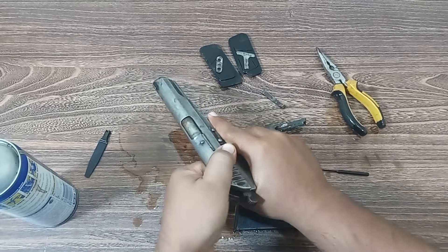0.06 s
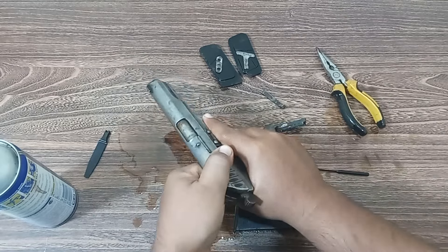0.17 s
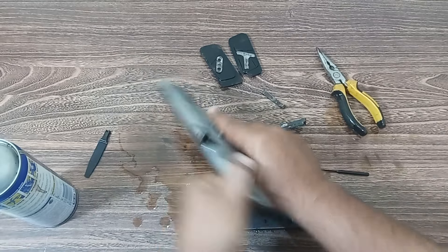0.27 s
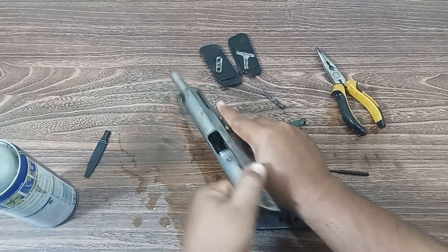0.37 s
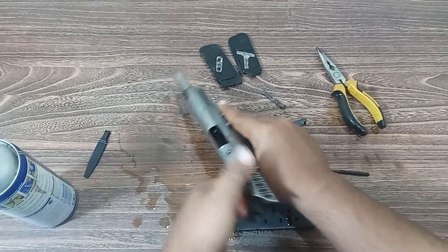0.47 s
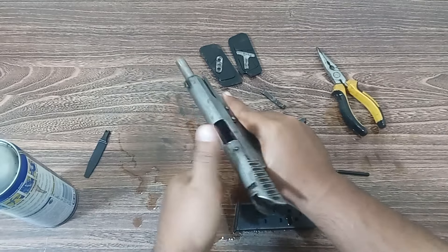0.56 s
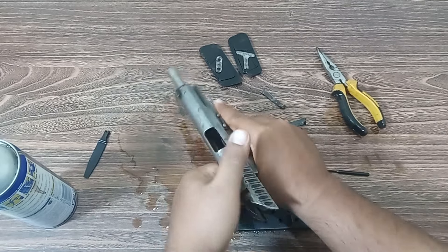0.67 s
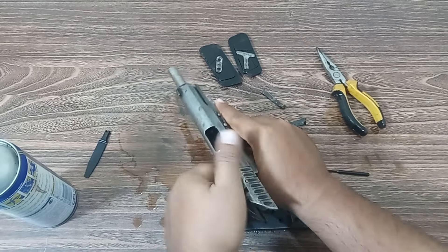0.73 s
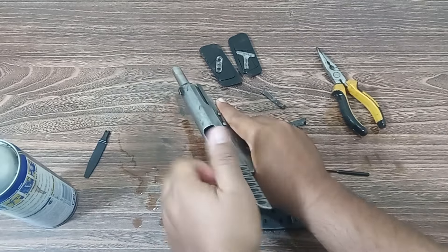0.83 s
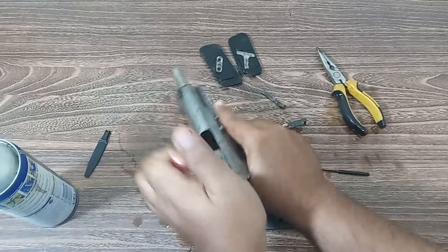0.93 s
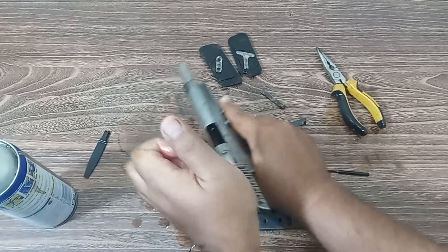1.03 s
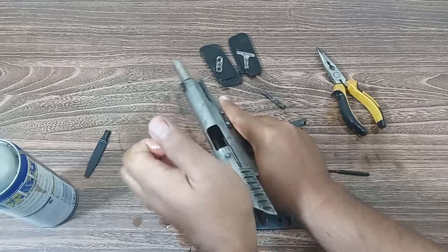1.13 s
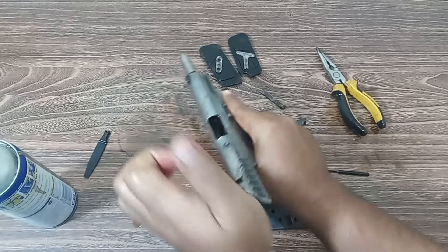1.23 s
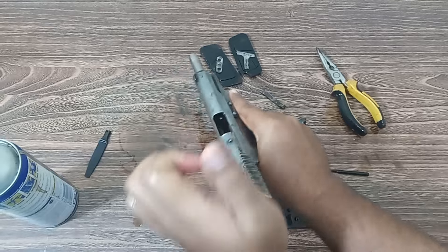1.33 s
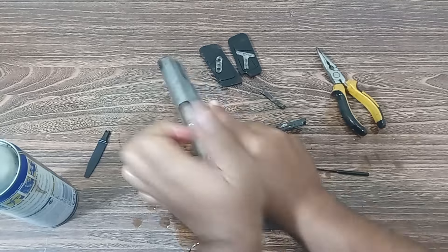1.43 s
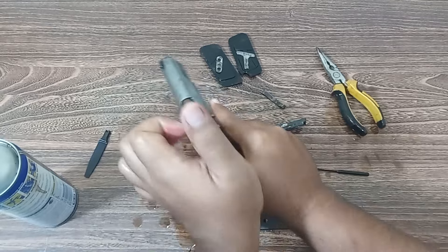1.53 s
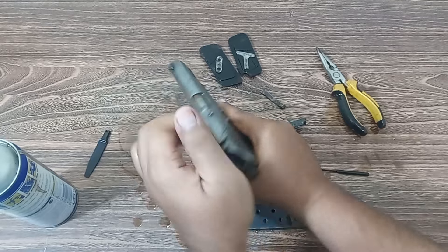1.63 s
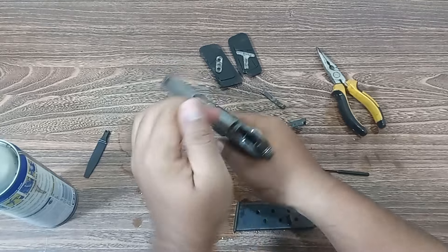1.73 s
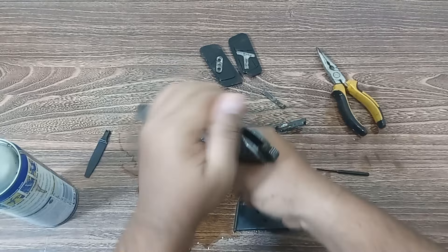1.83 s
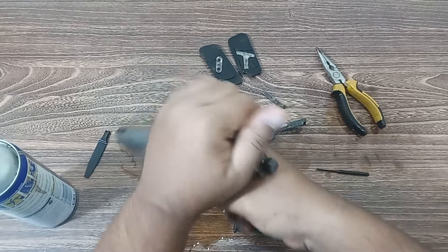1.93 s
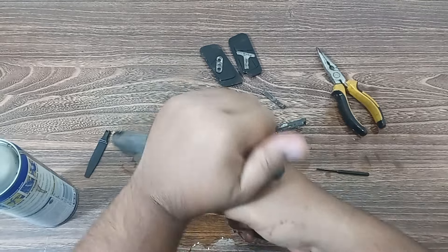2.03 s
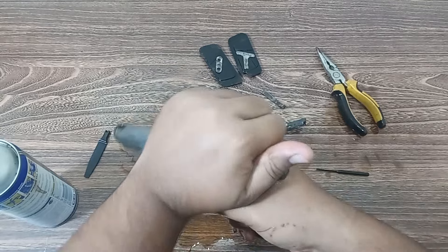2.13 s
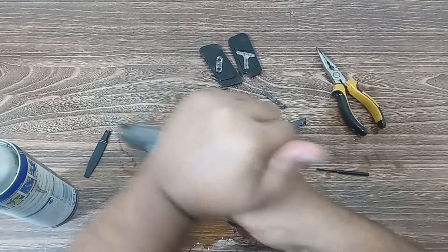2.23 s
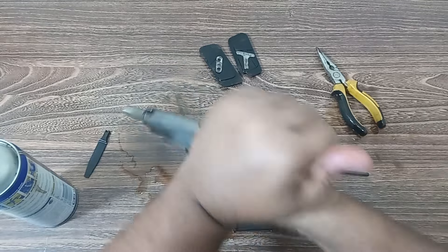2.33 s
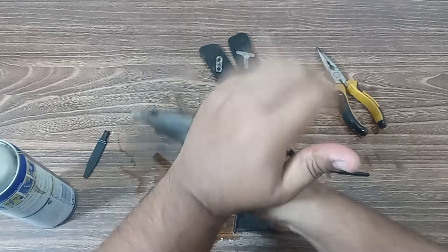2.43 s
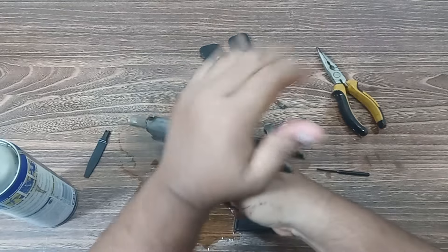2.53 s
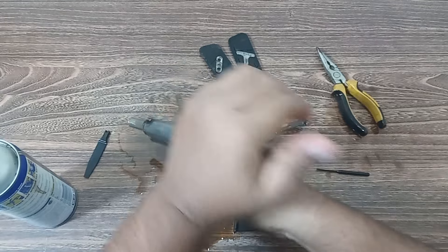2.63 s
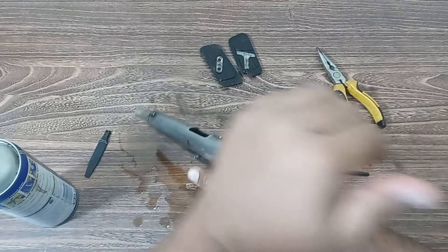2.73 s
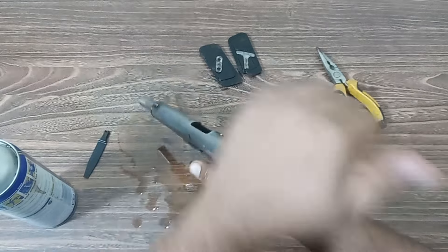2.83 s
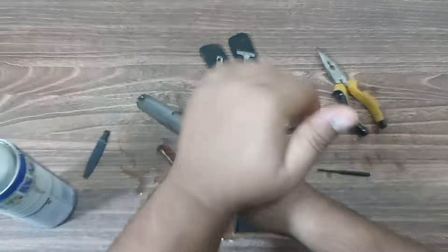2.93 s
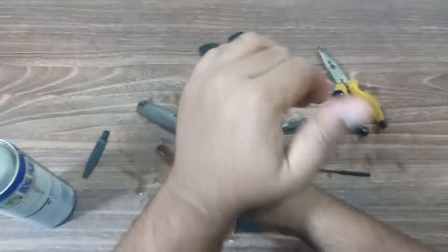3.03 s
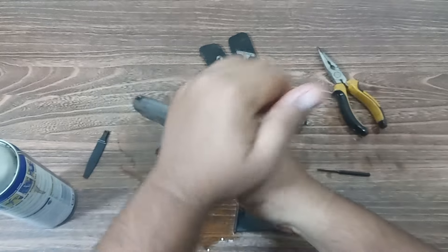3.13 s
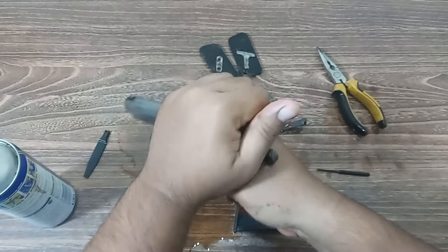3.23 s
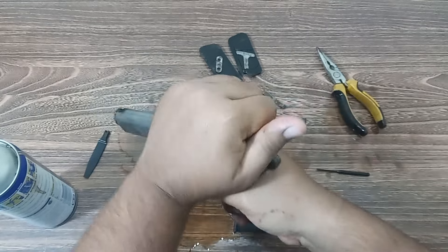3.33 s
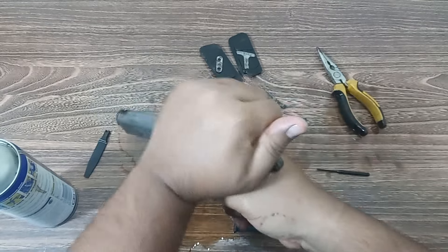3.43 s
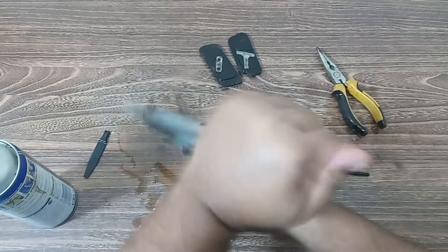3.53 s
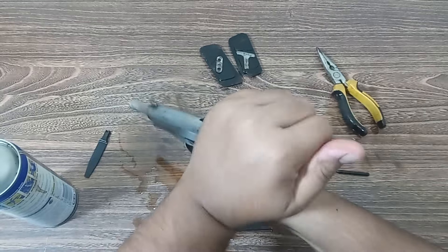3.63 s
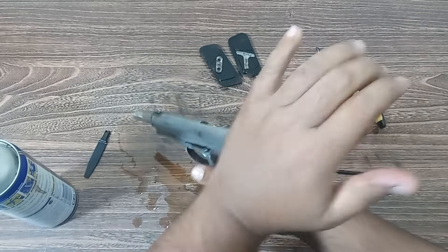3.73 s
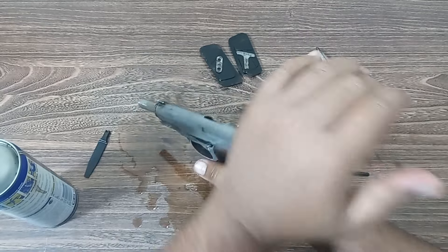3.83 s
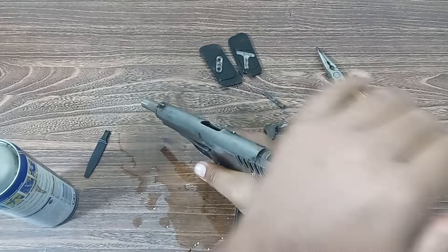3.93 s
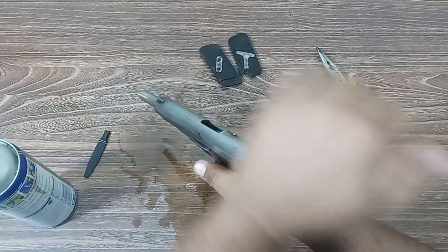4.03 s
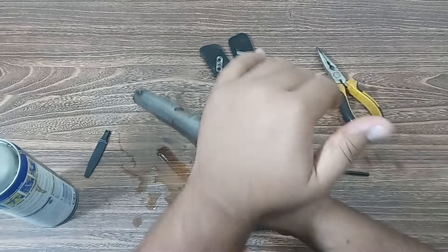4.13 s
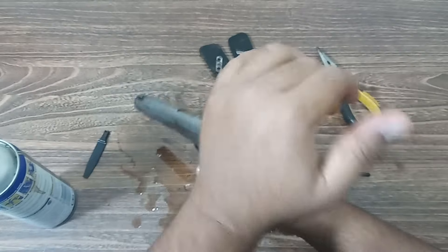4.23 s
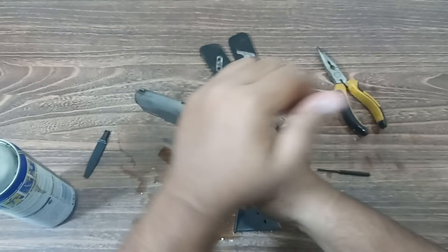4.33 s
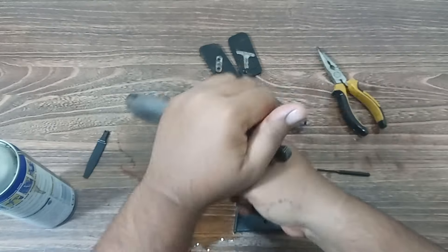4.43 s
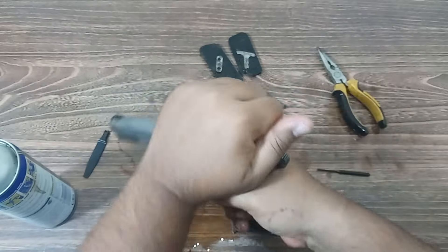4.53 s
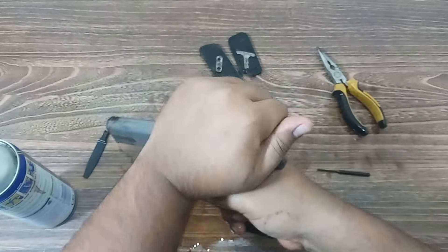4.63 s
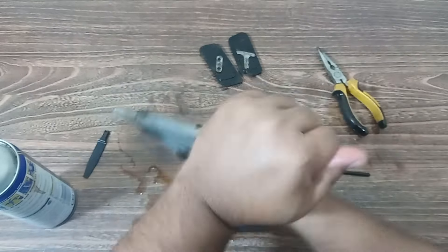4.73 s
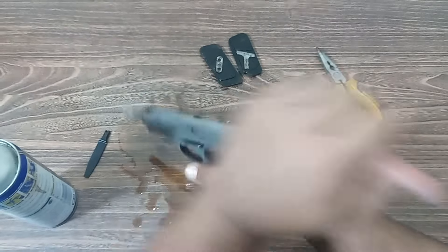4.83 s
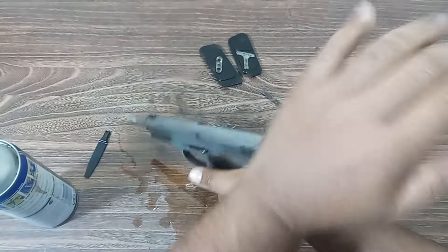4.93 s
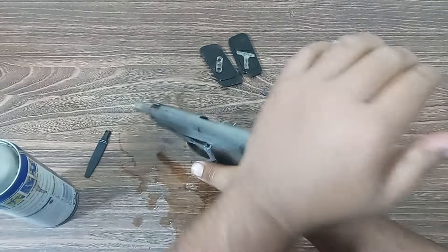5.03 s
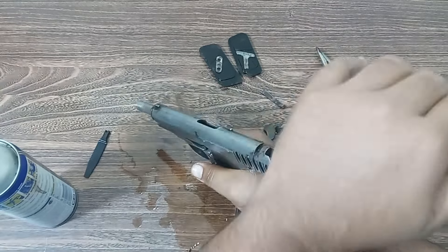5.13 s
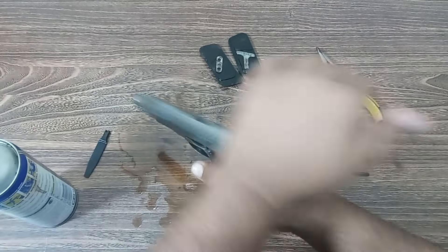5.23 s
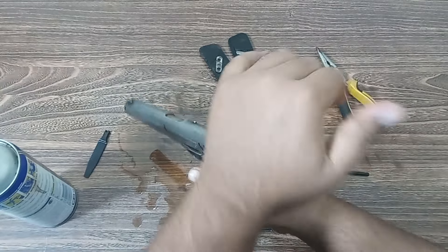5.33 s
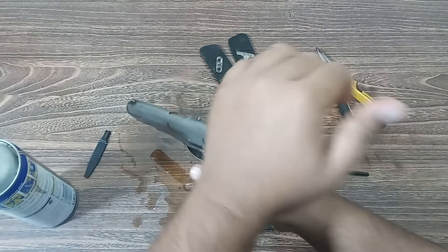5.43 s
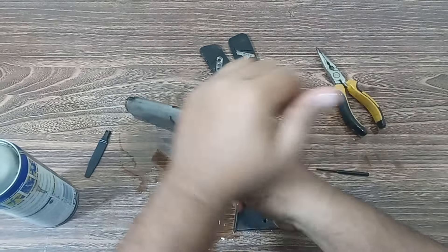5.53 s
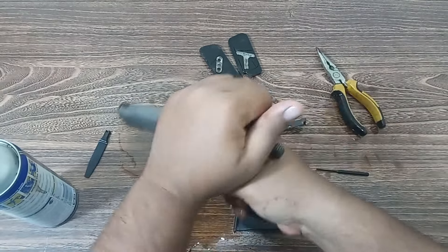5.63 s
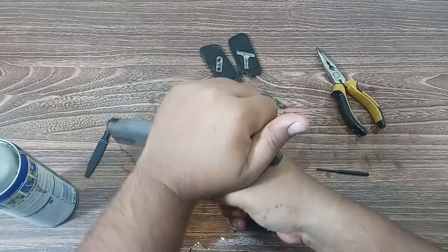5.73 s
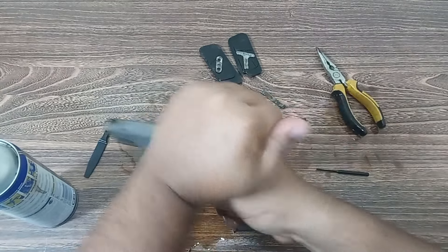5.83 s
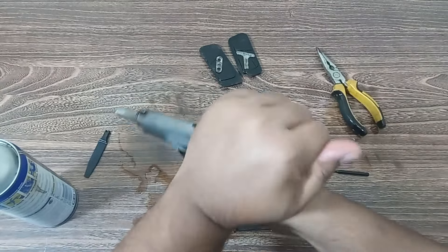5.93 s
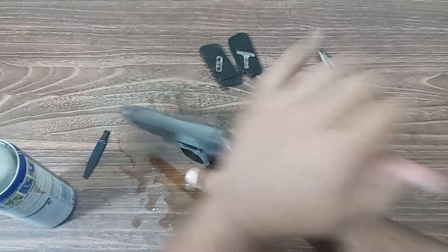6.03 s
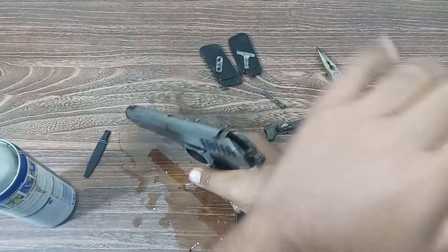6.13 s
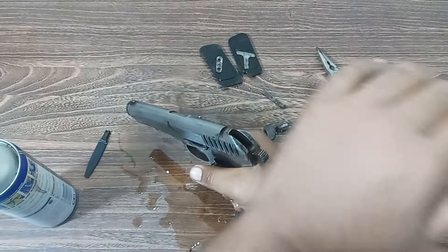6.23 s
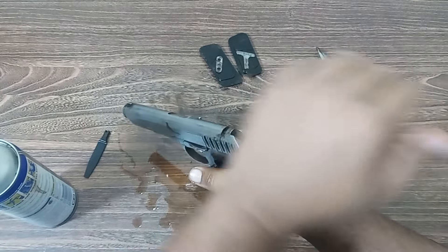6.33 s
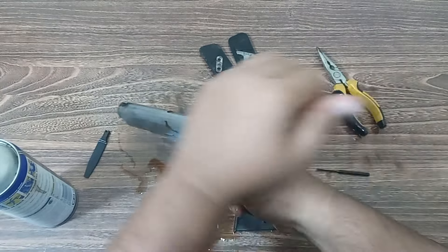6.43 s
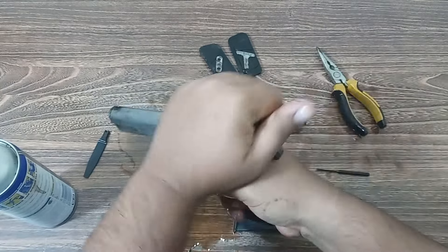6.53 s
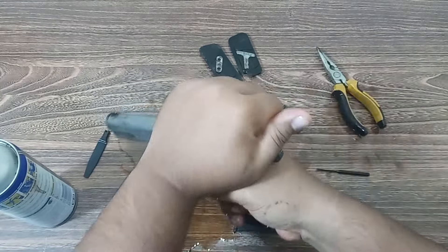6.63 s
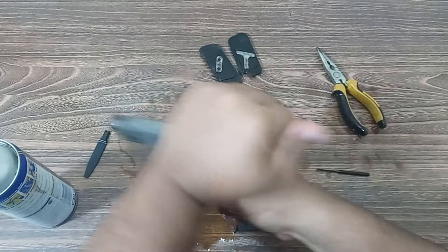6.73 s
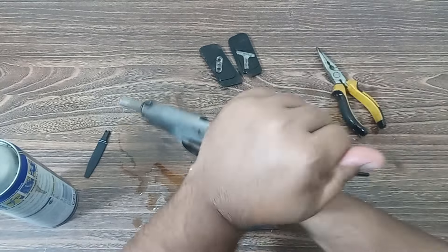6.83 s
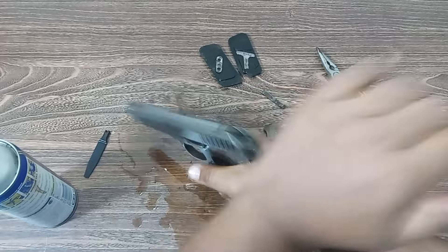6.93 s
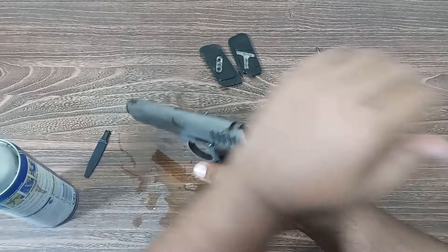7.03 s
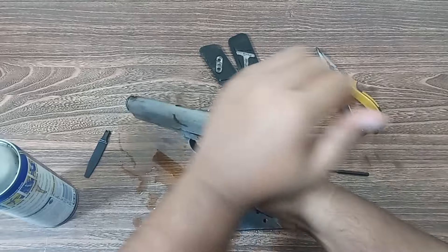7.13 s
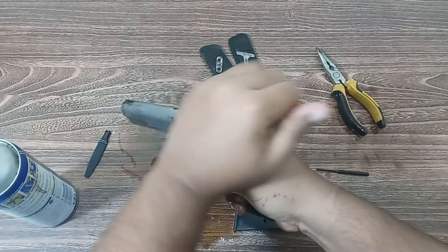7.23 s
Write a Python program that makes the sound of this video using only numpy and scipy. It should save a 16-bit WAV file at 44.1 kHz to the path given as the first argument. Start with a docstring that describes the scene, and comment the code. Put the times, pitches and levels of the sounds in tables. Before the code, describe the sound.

A steel pistol is racked over a table in a bare, reverberant room, close to a mono microphone. A metallic clack sounds right at the start. Around 0.3 seconds the slide is drawn back with a short scrape and a rapid run of four clacks, fairly dry, then waits; at 1.5 it slams home with a loud bright crack, a dull thump and faint high steel ringing. Pulls follow at about 2.3, 3.6, 4.75, 5.9 and 6.8 seconds, each a tight clicking clatter, answered by slams at 2.9, 4.1, 5.3, 6.1 and 7.0. The last two pairs are quickest, with barely 0.2 seconds between pull and slam. Compression ducks each blow and lets the room echo swell behind it before dying away. Tiny finger ticks and loose-part rubs appear between actions over quiet hiss.

```python
"""A steel pistol is racked again and again over a table in a bare, echoing room.
Each pull scrapes along the rails and clacks four times until the slide locks open; released, it slams home.
Blows and scrapes are bursts of uneven noise, shaped to sound like steel; ringing parts are fading sines.
Fingers and loose parts tick softly, over a quiet background hiss.
A close mono microphone with a look-ahead compressor ducks every blow and lets the room swell up behind it."""
import sys
import numpy as np
from scipy import signal
from scipy.fft import rfft, irfft
from scipy.io import wavfile
from scipy.ndimage import uniform_filter1d, minimum_filter1d

SR = 44100
rng = np.random.default_rng(int(sys.argv[2]) if len(sys.argv) > 2 else 0)


def dump(signal):
    """Clip the signal to [-1, 1] and save it as 16-bit WAV at the path in sys.argv[1]."""
    limited = np.clip(np.atleast_2d(signal).T, -1, 1)
    pcm = np.round(limited * 32767).astype(np.int16)
    wavfile.write(sys.argv[1], SR, pcm)


N = 321048

# The slide slams shut: t/s, strength/dB, length/s, ring/dB and knock/dB (both relative to the strength),
# thump/dB, starting pitch of the thump f/Hz, bounce/dB, scrape on the way/dB
SLIDE_SLAMS = [(0.009, -5, 0.005, -7, -25, -34, 250, -36.5, -32),
               (1.459, 7, 0.0053, -5.5, -12, -2.5, 270, -22, -18),
               (2.916, 8.5, 0.0022, -4.5, -11.5, -2, 263, -22, -25.5),
               (4.1088, 5.5, 0.0057, -3, -14, -10, 810, -14, -16.5),
               (5.286, 6, 0.0046, -7, -9.5, -11, 386, -19.5, -30),
               (6.078, 1, 0.0091, -2.5, -9.5, -5.5, 228, -25, -33),
               (6.9754, 4, 0.0053, -6, -10.5, -14, 473, -10, -25.5)]
# The slide is drawn back: t/s at the rear stop, travel time/s, first scrape/dB,
# then the force of the contacts: at the unlocking/dB, in mid travel/dB, at the stop/dB
SLIDE_PULLS = [(0.3385, 0.084, -46, -6, -2, -8), (2.3122, 0.0477, -38, 2, -0.5, 0),
               (3.5646, 0.0524, -43, 2, 0, 0), (4.752, 0.0528, -31, 0, 1, -1.5),
               (5.922, 0.0585, -32, -8, 1, -1), (6.8085, 0.0535, -39, -14, 0, -2)]
# Colour of steel striking steel, only its shape counts: f/Hz, level per Hz/dB
STEEL_COLOUR = [(150, -37.5), (350, -29.5), (800, -24.5), (1500, -14.5), (2050, -6), (3000, -7),
                (3900, -0.5), (5200, -0.5), (6800, 5.5), (7400, -5), (8100, -13), (10500, -13.5),
                (13200, -22.5), (15300, -8.5)]


def from_db(db):
    """Decibels to gain."""
    return 10 ** (np.asarray(db) / 20)


def at_hz(points, hz):
    """Read a table between its points, along a logarithmic frequency axis."""
    known_hz, values = np.transpose(points)
    return np.interp(np.log(np.maximum(hz, 1)), np.log(known_hz), values)


def coloured(x, spectrum):
    """Give a sound a colour without sounding early (minimum phase); white noise keeps its power."""
    size = 8192
    gain = from_db(at_hz(spectrum, np.fft.rfftfreq(size, 1 / SR)))
    gain /= np.sqrt(np.mean(gain ** 2))
    # folding the cepstrum moves the filter's energy to its start
    cepstrum = irfft(np.log(gain))
    cepstrum[1:size // 2] *= 2
    cepstrum[size // 2 + 1:] = 0
    response = irfft(np.exp(rfft(cepstrum)))
    return signal.oaconvolve(x, response)[:N]


def ring(force, hz, t60):
    """A resonance: a unit click starts a sine of height 1 that fades by 60 dB in t60 seconds."""
    decay = from_db(-60 / (t60 * SR))
    step = 2 * np.pi * hz / SR
    feedback = [1, -2 * decay * np.cos(step), decay * decay]
    return signal.lfilter([0, np.sin(step)], feedback, force + 1e-18)


def clicks(times, levels_db):
    """One single impulse for each blow."""
    out = np.zeros(N)
    places = np.clip(np.round(np.asarray(times) * SR).astype(int), 0, N - 1)
    np.add.at(out, places, from_db(levels_db))
    return out


def contacts(rows, rise_s, fade_s, grain_db):
    """Each (t/s, level/dB, length/s) is a chatter of uneven impacts that builds, holds, then dies away."""
    out = np.zeros(N + SR)
    t = np.arange(SR // 4) / SR
    for s, db, length in rows:
        # every 16 samples the impacts change size
        grain = from_db(grain_db * rng.standard_normal(len(t) // 16 + 1))
        sizes = grain[np.arange(len(t)) // 16]
        envelope = (1 - np.exp(-t / rise_s)) * np.exp(-np.maximum(t - length, 0) / fade_s)
        burst = rng.standard_normal(len(t)) * sizes * envelope
        burst *= np.linalg.norm(envelope) / np.linalg.norm(burst)   # same energy in every draw
        start = max(round(s * SR), 0)
        out[start:start + len(t)] += from_db(db) * burst
    return out[:N]


def background():
    """A quiet, steady noise with its own colour."""
    # Colour of the background, only its shape counts: f/Hz, level per Hz/dB
    background_colour = [(25, -19.5), (70, 1.5), (250, 1.5), (600, -7.5), (1400, -10.5), (2000, -8.5),
                         (3000, -11), (6800, 3), (8000, -18), (15000, -31)]
    return from_db(-69) * coloured(rng.standard_normal(N), background_colour)


def scrapes():
    """The slide runs along its rails before each slam and at the start of each pull: t/s, level/dB, length/s."""
    run_up_s, run_up_scrape_s = 0.0225, 0.024   # the freed slide sets off this long before it slams
    lead_s, lead_scrape_s = 0.012, 0.025   # the scrape starts this long before the barrel unlocks
    forward = [(s - run_up_s, scrape_db, run_up_scrape_s) for s, *_, scrape_db in SLIDE_SLAMS]
    backward = [(s - travel_s - lead_s, scrape_db, lead_scrape_s)
                for s, travel_s, scrape_db, *_ in SLIDE_PULLS]
    return forward + backward


def rails():
    """Gritty sliding friction, with two hollow notes from the open frame."""
    friction = contacts(scrapes(), rise_s=0.003, fade_s=0.002, grain_db=3.0)
    soften = signal.butter(1, 7000, fs=SR, output="sos")
    softened = signal.sosfilt(soften, coloured(friction, STEEL_COLOUR))
    high_note = from_db(-36.5) * ring(friction, hz=1400, t60=0.051)
    low_note = from_db(-48.0) * ring(friction, hz=695, t60=0.0028)
    return softened + high_note + low_note


def slams():
    """The spring drives the slide home: a bright crack, and the barrel rings on faintly."""
    # Long ring of barrel and spring, with a cluster of beating partials: f/Hz, level/dB, t60/s
    barrel_modes = [(1760, -69.5, 1), (2050, -60, 0.59), (3740, -63, .65), (3820, -61.5, 1),
                    (3840, -59.5, .7), (3800, -59, 1), (3920, -56.5, .45), (5100, -67, .6),
                    (5450, -60, 0.95)]
    s, db, length, ring_db = np.transpose(SLIDE_SLAMS)[:4]
    crack = contacts(zip(s, db, length), rise_s=0.0006, fade_s=0.0051, grain_db=3.5)
    strike = contacts(zip(s, db + ring_db, length), rise_s=0.0005, fade_s=0.004, grain_db=2)
    ringing = sum(from_db(mode_db) * ring(strike, hz, t60) for hz, mode_db, t60 in barrel_modes)
    return coloured(crack, STEEL_COLOUR) + ringing


def knocks(rise_s):
    """The frame shudders dully at each blow; at either end of the travel the palm thumps and the hand bounces."""
    # Dull knock of the frame in the hand, only its shape counts: f/Hz, level per Hz/dB
    frame_colour = [(25, -20.5), (60, -7.5), (120, 1), (200, -4.5), (400, 2), (700, -8), (1300, -2),
                    (2500, -39.5)]
    thump_sag_s = 0.013   # the thump's pitch sags towards the bounce
    bounce_delay_s, bounce_hz, bounce_t60_s = 0.011, 72, 0.03
    stop_thump_db, stop_thump_hz, stop_bounce_db = -39.5, 180, -27.5   # levels relative to the force there

    shoves = [(s + 0.0014, db + knock_db, length / 2)
              for s, db, length, ring_db, knock_db, *_ in SLIDE_SLAMS]
    shoves += [(s, db - 26.5 + knock_db, length)
               for s, db, length, crack_db, clang_db, knock_db in clacks()]
    shudder = contacts(shoves, rise_s=0.00099, fade_s=0.0016, grain_db=0.5)
    out = coloured(shudder, frame_colour)

    thumps = [(s, thump_db, hz, bounce_db) for s, *_, thump_db, hz, bounce_db, scrape_db in SLIDE_SLAMS]
    thumps += [(s, stop_db + stop_thump_db, stop_thump_hz, stop_db + stop_bounce_db)
               for s, *_, stop_db in SLIDE_PULLS]
    times, *_, bounce_db = np.transpose(thumps)
    out += ring(clicks(times + bounce_delay_s, bounce_db), bounce_hz, bounce_t60_s)

    t = np.arange(SR // 10) / SR
    swell = (t / rise_s * np.exp(1 - t / rise_s)) ** 2   # reaches 1 after rise_s
    for s, db, hz, _ in thumps:
        start = max(round(s * SR), 0)
        pitch = bounce_hz + (hz - bounce_hz) * np.exp(-t / thump_sag_s)
        out[start:start + len(t)] += from_db(db) * swell * np.sin(2 * np.pi * np.cumsum(pitch) / SR)
    return out


def room(x, gap_s, build_s):
    """Dense reflections build up after a short gap, then die band by band, the highest treble fastest."""
    # Colour of the room's answer, only its shape counts: f/Hz, level/dB
    room_colour = [(60, -24), (200, -11.5), (320, 11.5), (420, 1.5), (800, -1.5), (1450, -7), (1900, -4.5),
                   (3000, -4), (6500, -1.5), (10000, 0), (15500, -2)]
    # How long the echoes last in each band: f/Hz, t60/s
    echo_times = [(200, 0.45), (600, 0.64), (1900, 0.81), (3800, 0.76), (6500, 0.65), (9000, 0.51),
                  (15000, 0.35)]
    t = np.arange(3 * SR // 2) / SR
    white = rfft(rng.standard_normal(len(t)))
    hz = np.fft.rfftfreq(len(t), 1 / SR)
    centres_hz = np.array(echo_times)[:, 0]
    echoes = 0
    for (centre_hz, t60), own in zip(echo_times, np.eye(len(echo_times))):
        # each band is full at its own centre and blends into its neighbours
        share = at_hz(np.column_stack([centres_hz, own]), hz)
        echoes = echoes + irfft(white * share, len(t)) * from_db(-60 * t / t60)
    echoes *= 1 - np.exp(-np.maximum(t - gap_s, 0) / build_s)
    echoes /= np.linalg.norm(echoes)
    return coloured(signal.fftconvolve(x, echoes)[:N], room_colour)


def clacks():
    """The four contacts of every pull: t/s, strength/dB, length/s, then relative crack/dB, clang/dB, knock/dB."""
    # Barrel unlocks, hammer is cocked, catch snaps over, rear stop: strength/dB, length/s,
    # then relative to the strength: crack/dB, clang/dB, knock/dB
    stages = [(-31, .005, 4.5, 7.5, -19), (-9, .005, -2.5, -2.5, -12), (-7, 0.00401, -2.5, -1.5, -24.5),
              (-1, .0055, -15.5, -13.5, 0)]
    # Share of the travel still to go at each contact: one column [no unit]
    shares_to_go = (1, .667, .35, 0)
    rows = []
    for s, travel_s, _, unlock_db, mid_db, stop_db in SLIDE_PULLS:
        forces_db = (unlock_db, mid_db, mid_db, stop_db)
        for to_go, (db, *shape), force_db in zip(shares_to_go, stages, forces_db):
            rows.append((s - to_go * travel_s, db + force_db, *shape))
    return rows


def pulls():
    """Drawing the slide back: every clack is a snap with its own share of hard crack."""
    # Snap of the small lock parts, only its shape counts: f/Hz, level per Hz/dB
    snap_colour = [(300, -26), (1400, -19.5), (2100, -10.5), (2900, -9.5), (4400, 1), (5500, -0.5),
                   (6600, 2.5), (7300, -3.5), (8100, -19), (10500, -63.5), (13200, -37.5), (15300, -12.5)]
    s, db, length, crack_db = np.transpose(clacks())[:4]
    snap = contacts(zip(s, db, length), rise_s=0.00045, fade_s=0.0019, grain_db=5.5)
    crack = contacts(zip(s, db + crack_db, length), rise_s=0.00019, fade_s=0.0038, grain_db=6.0)
    # the unlocked barrel no longer adds its ring to the clacks
    dip = signal.iirnotch(3880, 14.5, fs=SR)   # Hz, sharpness
    return signal.lfilter(*dip, coloured(snap, snap_colour) + coloured(crack, STEEL_COLOUR))


def clangs():
    """The open slide clangs close to the microphone; each clack strikes its modes a little differently."""
    # Short clang of the open slide, before a random spread: f/Hz, level/dB, t60/s
    slide_modes = [(1440, -23.5, 0.021), (2054, -9.5, 0.043), (2140, -28.5, .02), (3240, -5, 0.039),
                   (3400, -19, .01), (4170, -13, 0.014), (5080, -14, 0.013), (5700, -15.5, .01),
                   (6450, -14, 0.0093)]
    s, db, length, crack_db, clang_db, knock_db = np.transpose(clacks())
    out = 0
    for hz, mode_db, t60 in slide_modes:
        spread_db = rng.normal(0, 2.8, len(s))
        strikes = clicks(s + length / 2, db + clang_db + mode_db + spread_db)
        out = out + ring(strikes, hz, t60)
    return out


def gun():
    """The sound that one face of the pistol sends out."""
    return rails() + slams() + pulls()


def grip():
    """Fingers and loose parts rub softly as the grip shifts, each touch with a pitch of its own."""
    # Soft touches: t/s, strength/dB, length/s, pitch f/Hz, ring t60/s
    touches = [(0.309, -32, 0.014, 4970, 0.5), (0.99, -68, 0.07, 5110, 0.017),
               (1.062, -64, 0.031, 5010, 0.046), (1.92, -49, 0.0044, 1160, 0.043),
               (2.222, -46, 0.018, 5870, 0.0021), (2.693, -52, 0.074, 5440, 0.014),
               (3.198, -69, 0.15, 242, 0.23), (3.443, -51.5, 0.018, 5450, 0.0083),
               (6.549, -61.5, 0.24, 5460, 0.0027)]
    out = 0
    for s, db, length, hz, t60 in touches:
        touch = contacts([(s, db, length)], rise_s=0.003, fade_s=0.005, grain_db=2.5)
        same_power = np.sqrt(4 * np.log(1000) / (t60 * SR))   # at any ring time
        out = out + ring(touch, hz, t60) * same_power
    return signal.sosfilt(signal.butter(8, 7300, fs=SR, output="sos"), out)


def scene():
    """Gun, room and background, the same in both channels."""
    # How much of the gun's sound reaches the room, least around the end of the first, slow pull: t/s, level/dB
    room_exposure = [(0.1, 4.5), (0.28, -2), (0.36, -17), (1.4, -.5), (6.0, 0)]
    # each face chatters in its own way and takes its own paths round the room
    top, flank, underside = gun(), gun(), gun()
    no_rumble = signal.butter(2, 58, "high", fs=SR, output="sos")
    near = signal.sosfilt(no_rumble, knocks(rise_s=0.0032)) + clangs()
    exposure = from_db(np.interp(np.arange(N) / SR, *np.transpose(room_exposure)))
    reverb = sum(room(exposure * face, gap_s=0.0012, build_s=0.0021) for face in (top, flank, underside))
    mono = top + near + grip() + from_db(-12.0) * reverb + background()
    return np.tile(mono, (2, 1))


def loudness_db(x, size):
    """Average power of the first channel over a sliding window of size samples, in dB."""
    return 10 * np.log10(np.maximum(uniform_filter1d(x[0] ** 2, size=size), 1e-12))


def suppressor(x, open_db, slope, depth_db):
    """Noise suppression: the deeper the level sinks below the opening level, the more it is turned down."""
    cut_db = np.clip(slope * (open_db - loudness_db(x, 1200)), 0, depth_db)
    return x * from_db(-cut_db)


def compressor(x, threshold_db, slope, ahead_s, hold_s, release_db_per_s):
    """The gain drops just before a loud sound, is held, then recovers quickly."""
    cut_db = slope * np.maximum(loudness_db(x, 160) - threshold_db, 0)
    ahead, hold = round(ahead_s * SR), round(hold_s * SR)
    # the deepest cut nearby, from a little ahead to a little behind
    cut_db = -minimum_filter1d(-cut_db, ahead + hold, origin=(hold - ahead) // 2)
    # the cut may shrink no faster than the release
    recovery = release_db_per_s * np.arange(N) / SR
    cut_db = np.maximum.accumulate(cut_db + recovery) - recovery
    return x * from_db(-uniform_filter1d(cut_db, size=64))


def record(dry):
    """Quiet parts turned down, the top octave on its own; loud ones compressed, peaks rounded, top cut."""
    split = signal.butter(8, 7700, fs=SR, output="sos")   # Hz
    body = signal.sosfiltfilt(split, dry)
    treble = dry - body
    hushed = suppressor(body, open_db=-45, slope=0.39, depth_db=9.5)
    hushed = hushed + suppressor(treble, open_db=-47.5, slope=0.26, depth_db=14)
    even = compressor(hushed, threshold_db=-23.5, slope=0.62,
                      ahead_s=0.0091, hold_s=0.019, release_db_per_s=1098.5)
    ceiling = 0.46
    rounded = ceiling * np.tanh(even / ceiling)
    top_cut = signal.ellip(10, 0.2, 70, 16000, fs=SR, output="sos")   # steep, from 16 kHz
    return signal.sosfilt(top_cut, rounded)


dry = scene()
out = record(dry)
dump(out)
```